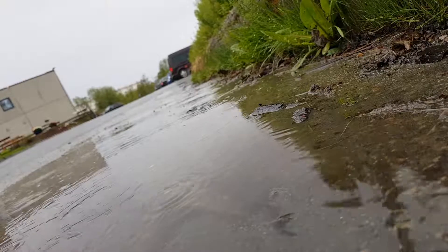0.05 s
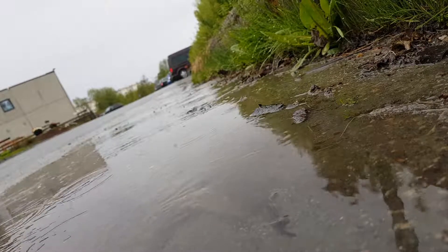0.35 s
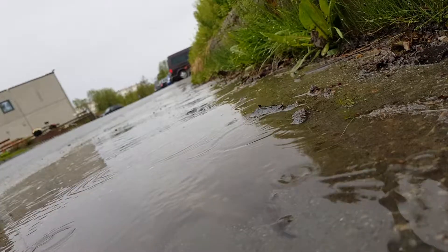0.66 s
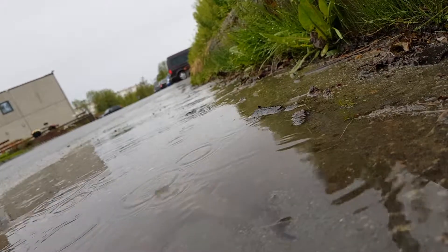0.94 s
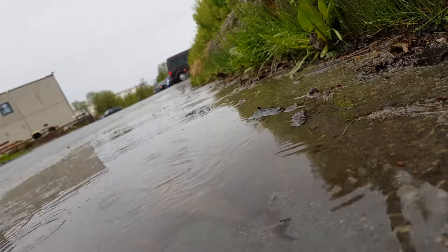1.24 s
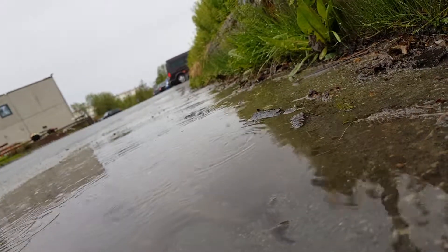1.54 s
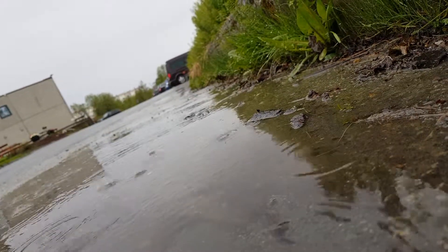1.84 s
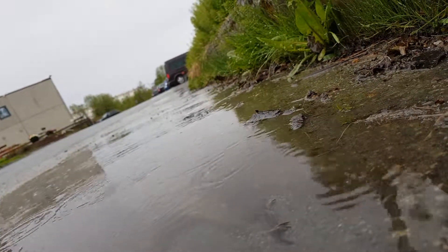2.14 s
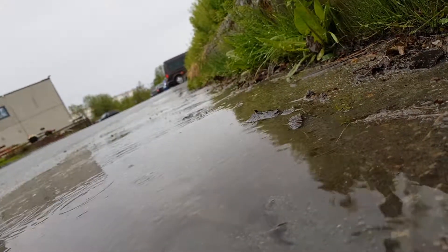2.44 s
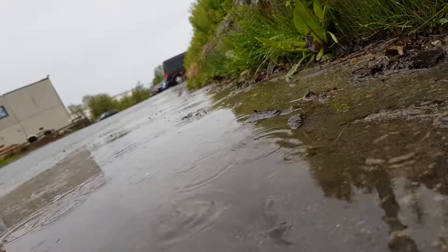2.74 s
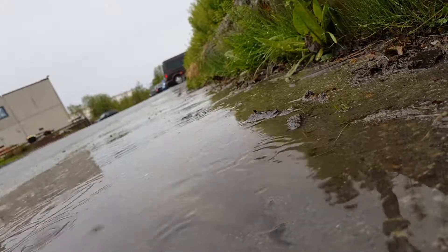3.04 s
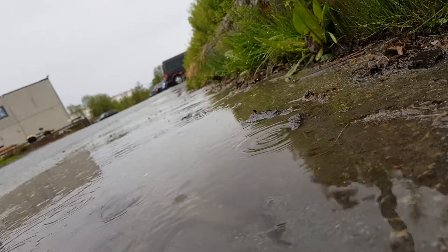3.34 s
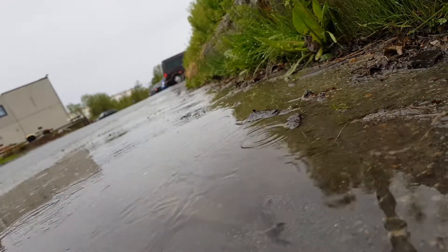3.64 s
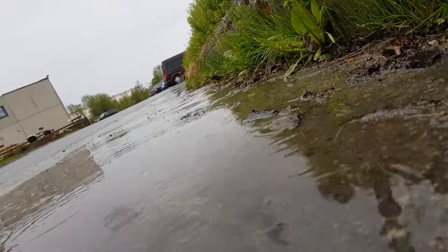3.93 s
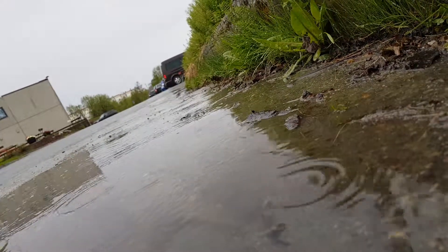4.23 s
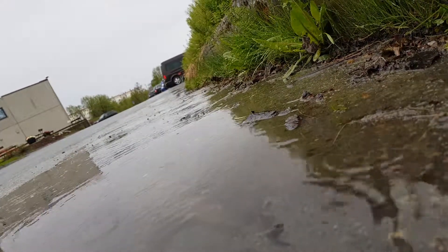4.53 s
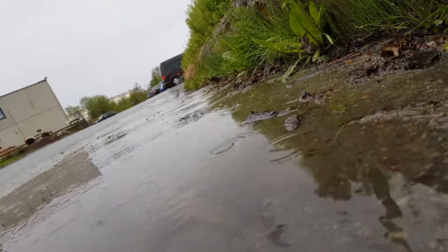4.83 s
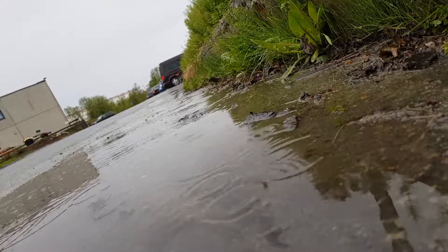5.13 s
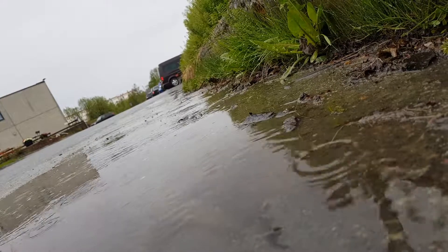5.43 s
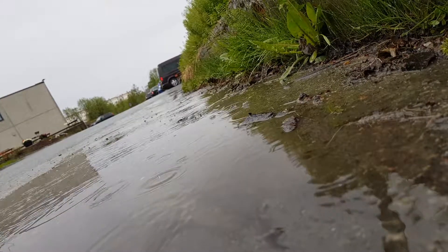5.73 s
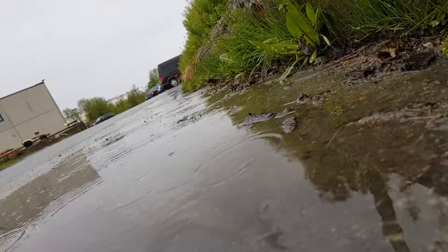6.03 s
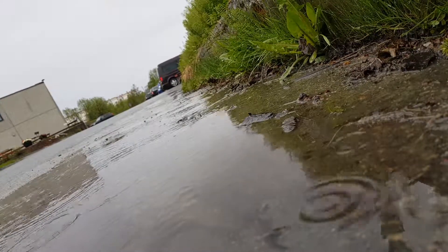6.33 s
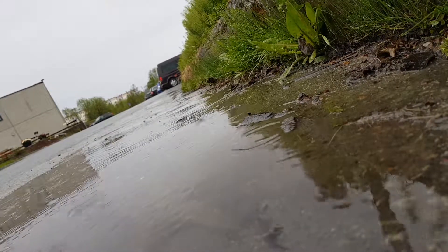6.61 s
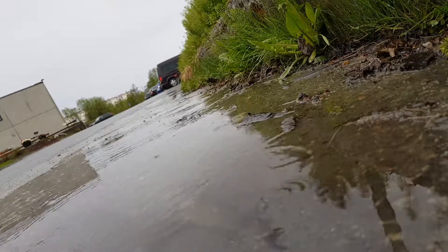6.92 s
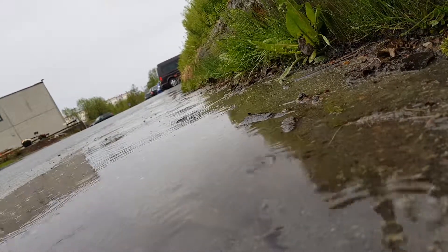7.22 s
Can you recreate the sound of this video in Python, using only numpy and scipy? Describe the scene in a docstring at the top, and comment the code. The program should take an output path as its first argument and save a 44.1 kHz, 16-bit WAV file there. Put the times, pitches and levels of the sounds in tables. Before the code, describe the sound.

Light rain falls by a roadside puddle, heard from just above the ground and mostly on the right. Small drops tap sharply on the wet ground and plink faintly in the water over a fine patter and hiss. Distant traffic rumbles throughout, with a steady electrical hum and a faint fan tone. Near the end a far vehicle passes with a brief low boom, then a distant bird chirps very faintly.

```python
"""Light rain by a roadside puddle

The microphone sits just above the ground, its right port open, its left one muffled. Close by, drops
tap on the wet ground or ring a tiny bubble in the puddle; farther out they merge into hiss. Distant
traffic rumbles and one vehicle booms briefly, over mains hum and a fan. A far bird chirps at the end."""
import sys
import numpy as np
from scipy import signal
from scipy.fft import rfft, irfft, next_fast_len
from scipy.io import wavfile
from scipy.ndimage import uniform_filter1d, map_coordinates

SR = 44100
rng = np.random.default_rng(int(sys.argv[2]) if len(sys.argv) > 2 else 0)


def wav_record(signal):
    """Record a signal, one row per channel, as 16-bit PCM in the file named by sys.argv[1]."""
    frames = np.transpose(np.atleast_2d(signal))
    bounded = np.clip(frames, -1, 1)
    # unit amplitude maps onto the largest positive 16-bit level
    quanta = np.round(bounded * 32767).astype(np.int16)
    wavfile.write(sys.argv[1], SR, quanta)


N = 325017


# Tone of close drops through the microphone, which has a notch near 8 kHz.
# Each row: frequency in Hz, gain in dB.
CLOSE_MIC_TONE = [(400, -20), (1300, 15), (2400, 2.5), (4500, 0), (6500, 0.5), (7400, -3), (8300, -15),
                  (10000, -9.5), (12300, -4.5), (15800, -6)]
# Drops on the wet ground nearest the microphone.
# Each row: start in seconds, peak at the right port in dB, centre in Hz, width in octaves.
GROUND_TAPS = [(0.1154, -30.5, 4100, 0.42), (.211, -28.5, 4700, 0.27), (.231, -38, 4800, 1.2),
               (.3734, -19, 4700, 0.85), (.5254, -37.5, 5400, .6), (1.1142, -29.5, 5000, 0.75),
               (1.1245, -33, 2800, 0.9), (1.1473, -29, 3100, 0.84), (1.814, -27, 3800, .33),
               (1.8594, -37, 4400, 0.66), (2.489, -38, 6500, .5), (3.0658, -39, 8500, .7),
               (3.2465, -37, 3600, .4), (3.495, -41, 8500, .6), (3.5994, -38, 5700, .35),
               (4.522, -36.5, 6400, .3), (4.658, -40, 6000, .4), (4.7896, -39, 5300, .4),
               (4.8492, -38, 4200, .8), (5.0366, -32, 5200, .8), (5.5324, -31.5, 4500, 1),
               (5.7843, -31, 3500, 0.42), (5.984, -40, 7000, .4), (6.1073, -30.5, 4700, 0.27),
               (6.1287, -37, 3500, .5), (6.453, -33, 2400, 0.53), (6.8336, -35, 4000, .8),
               (6.8458, -36, 5900, 0.3), (6.9292, -35, 6500, 1.2), (7.0702, -29, 6100, .42),
               (7.0887, -35, 5500, .8), (7.1174, -29, 4200, .9), (7.1375, -31, 4400, 1.1)]

def taps(splash_t60):
    """A near drop hits the ground with one sharp pulse, then a few milliseconds of splash."""
    out = np.zeros((2, N))
    t = np.arange(1024) / SR
    hz = np.fft.rfftfreq(len(t), 1 / SR)
    for start, db, centre_hz, width_octaves in [*GROUND_TAPS, *faint_drops()]:
        # smaller drops sound higher; a narrow band rings like a plip
        size_colour = 0.04 + 1 / (1 + (np.log2((hz + 1) / centre_hz) / width_octaves) ** 2)
        pulse = causal(amp(along(CLOSE_MIC_TONE, hz)[0]) * size_colour)
        # the flatter a drop lands, the wider its band and the more it splashes
        splash_db = -21 + 3.5 * width_octaves
        splash = amp(splash_db - 60 * t / splash_t60) * rng.standard_normal((2, len(t)))
        tap = signal.fftconvolve((t == 0) + splash, pulse[None], axes=1)
        add(out, start, amp(db) * tap / abs(tap[1]).max())
    return out


def faint_drops(per_second=2.5, peak_db=-41, centre_hz=4200, width_octaves=0.55):
    """Random drops land a little farther off, given as rows like those of GROUND_TAPS."""
    when, size, pitch = rng.random((int(per_second * N / SR), 3)).T
    db = peak_db + 5 * (size - .5)
    hz = centre_hz * 2 ** (pitch - .5)
    return np.column_stack([when * N / SR, db, hz, np.full(len(when), width_octaves)])


# Drops in the puddle beside the microphone.
# Each row: start in seconds, peak at the right port in dB, pitch in Hz, seconds to fade by 60 dB.
PUDDLE_BUBBLES = [(0.2261, -34, 12500, .0017), (0.3993, -42, 14000, .001), (0.504, -45, 14000, .0015),
                  (0.8007, -48, 11500, .0012), (1.9099, -36, 12300, 0.002), (2.535, -33, 13400, .003),
                  (2.7525, -45, 12000, .001), (3.432, -46, 11500, .0016), (5.5584, -45, 13000, .001),
                  (6.9197, -39, 11300, .0012), (7.0973, -30, 12400, 0.0016)]

def bubbles(attack_share):
    """A drop traps a tiny bubble, whose ring swells and dies within a few dozen cycles."""
    out = np.zeros((2, N))
    t = np.arange(SR // 100) / SR
    for start, db, hz, t60 in PUDDLE_BUBBLES:
        attack = (1 - np.exp(-t / (attack_share * t60))) ** 2
        ring = np.sin(2 * np.pi * hz * t) * amp(-60 * t / t60) * attack
        add(out, start, amp(db) * np.array([ring, ring]) / abs(ring).max())
    return out


# Close drops that shatter softly, heard only as spray.
# Each row: start in seconds, relative droplet level in dB.
SOFT_DROPS = [(.49, -40), (.8, -43), (1.39, -41), (1.83, -43), (2.75, -37), (3.06, -43), (4.47, -40),
              (4.55, -41), (5.54, -38.5), (6.76, -42)]

def sprays(droplets, longest_flight_s=0.068, faint_per_second=1.5):
    """A shattered drop scatters tiny droplets that land soon after, ever fewer and fainter."""
    tapped = [(start, -47 + 3.5 * width_octaves) for start, _, _, width_octaves in GROUND_TAPS]
    faint = [(start, -44.5) for start in rng.random(int(faint_per_second * N / SR)) * N / SR]
    start, db = np.transpose(tapped + SOFT_DROPS + faint)[:, :, None]
    flight = rng.random((len(start), droplets)) ** 1.3
    droplet_db = db - 5 * flight + 4.4 * rng.standard_normal(flight.shape)
    landings = start + longest_flight_s * flight
    return ticks(landings.ravel(), droplet_db.ravel(), centre_hz=12500, spread_octaves=0.33, cycles=1.0)


def patter(per_second, base_db, centre_hz, ticks_per_drop):
    """Drops land a few steps away, many faint and few stronger, each trailed by weaker droplets."""
    when, size = rng.random((2, int(per_second * N / SR), 1))
    flight = rng.random((len(when), ticks_per_drop)) * (np.arange(ticks_per_drop) > 0)
    db = base_db + 3.5 * np.minimum(-np.log(size), 3.5) - 14 * np.sqrt(flight)
    landings = when * N / SR + .014 * flight
    return ticks(landings.ravel(), db.ravel(), centre_hz, spread_octaves=0.446, cycles=1.95)


def ticks(times, db, centre_hz, spread_octaves, cycles):
    """Each droplet lands with one damped tick of random pitch, heard through the microphone."""
    t = np.arange(128) / SR
    octaves = spread_octaves * rng.standard_normal((len(times), 1))
    hz = np.clip(centre_hz * 2 ** octaves, 1500, 15500)
    waves = amp(db)[:, None] * np.sin(2 * np.pi * hz * t) * np.exp(-hz * t / cycles)
    places = np.maximum(times * SR, 0).astype(int)[:, None] + np.arange(len(t))
    track = np.bincount(places.ravel(), waves.ravel(), N)[:N]
    return filtered(track, lambda f: amp(along(CLOSE_MIC_TONE, f)[0]))


def near_rain():
    """Near drops reach the open right port directly and the left one faint and dull."""
    left, right = (taps(splash_t60=0.013)
                   + bubbles(attack_share=0.088)
                   + patter(per_second=120, base_db=-54.5, centre_hz=4400, ticks_per_drop=4)
                   + patter(per_second=58, base_db=-49.0, centre_hz=12000, ticks_per_drop=5)
                   + sprays(droplets=16))
    muffled = amp(-22) * filtered(left, lambda hz: below(hz, 4000, order=4))
    return np.array([muffled, right])


# Hiss of far rain; in the left treble, only the microphone's faint noise floor.
# Each row: frequency in Hz, left and right gain in dB.
HISS_COLOUR = [(2200, -92.5, -89), (2490, -94.5, -86.5), (2790, -102.5, -88), (3030, -103.5, -91.5),
               (4600, -108.8, -93), (5700, -118.4, -94.5), (6700, -119.4, -96), (7420, -119.6, -101.4),
               (8200, -119.9, -118.7), (9670, -117.5, -111.1), (11950, -113.3, -104.2),
               (14400, -113.6, -108.1), (15700, -113.7, -107.8)]
# Its slow rise and fall. Each row: time in seconds, gain in dB.
HISS_LEVEL = [(0, 0), (1.2, 0.4), (2.6, 0.6), (3.3, -0.5), (4.5, 0), (5.3, -0.2), (6.3, -0.4), (7.37, 0)]
# A fine sizzle over the rain. Each row: frequency in Hz, gain in dB.
SIZZLE_COLOUR = [(1500, -30), (3000, -1), (4700, 11), (7000, -8), (8600, -1.5), (9600, -17), (12000, 1),
                 (13800, 3), (15800, -10)]
# Its spells. Each row: start in seconds, length in seconds, level at the right port in dB.
SIZZLE_SPELLS = [(0, .55, -65.5), (1.8, 0.34, -65.5), (2.26, 0.48, -61.5)]

def far_rain(flutter_db=0.36):
    """Countless far drops merge into hiss over the noise floor; a finer sizzle comes and goes."""
    hiss = filtered(patchy(patchy_db=1.25),
                    lambda hz: amp(along(HISS_COLOUR, hz)) * above(hz, 2295, order=12))
    # the highest hiss comes from few close drops, so it flutters most
    treble = filtered(hiss[1], lambda hz: above(hz, 7100, order=6))
    treble_db = -1.66 + wobble(15) + 0.62 * wobble(7)
    hiss[1] = amp(-1) * (hiss[1] - treble) + amp(treble_db) * treble
    sizzle = unit(filtered(rng.standard_normal((2, N)), lambda hz: amp(along(SIZZLE_COLOUR, hz))))
    spells = sum(amp(db) * swell(start, length, attack_s=.06, release_s=0.2)
                 for start, length, db in SIZZLE_SPELLS)
    hiss_db = curve(HISS_LEVEL) + flutter_db * wobble(8)
    return amp(hiss_db) * hiss + spells * sizzle * amp([[-18], [0]])


# Distant traffic from ground level. Each row: frequency in Hz, left and right gain in dB.
TRAFFIC_COLOUR = [(25, -85, -84), (68, -70.5, -70), (127.6, -68, -66.5), (167.3, -59.7, -59.5),
                  (202, -66.5, -64), (218, -70.5, -64.5), (251, -65.7, -61.8), (295, -64, -61.5),
                  (331, -73.5, -64.5), (396, -73.5, -69), (524, -69.5, -76.5), (748, -73, -74.5),
                  (885, -79.5, -72.5), (1030, -77, -74.5), (1147, -73.5, -72), (1235, -77, -74),
                  (1340, -82, -82), (1500, -81, -80.5), (1590, -83.5, -82.5), (1730, -84.5, -79),
                  (1985, -89, -82), (2260, -97, -85.5)]
# How alike it is at the two ports. Each row: frequency in Hz, coherence 0-1, left lead in radians.
PORT_LIKENESS = [(25, .9, 0.5), (65, .98, -0.05), (197, 0.97, -0.04), (285, 0.91, 0.26), (390, .1, 2),
                 (465, 0.16, 1), (600, 0.61, -0.43), (788, 0.72, -0.3), (884, 0.2, -1.5), (937, 0.52, -3.5),
                 (1000, .64, -3.5), (1160, 0.92, -4.1), (1240, 0.7, -4.4), (1306, 0.32, -4.3),
                 (1483, 0.78, -3.5), (1666, 0.54, -4.5), (1730, 0.3, -5.2), (1870, .22, -5.5),
                 (2050, 0, -10.5), (2230, 0.7, -10.5)]
# The deep engine drone. Each row: time in seconds, gain in dB.
DRONE_LEVEL = [(0, 0), (1.05, -1), (1.7, 0.5), (2.25, -2.5), (3.2, 3), (4.5, -1.5), (4.9, 1), (5.7, -0.5),
               (7.37, 0.5)]
# The road roar above it. Each row: time in seconds, gain in dB.
ROAR_LEVEL = [(0, -0.9), (1.05, .5), (1.7, -0.1), (2.8, 0.1), (4.3, -0.8), (5.4, -0.4), (6.2, 0.14),
              (7.37, 0.1)]

def traffic():
    """Far engines rumble; their deep drone wanders and the road roar swells as vehicles come and go."""
    right, unrelated = patchy(patchy_db=.5)
    coherence = lambda hz: np.clip(along(PORT_LIKENESS, hz)[0], 0, 1)
    left = filtered(right, lambda hz: coherence(hz) * np.exp(1j * along(PORT_LIKENESS, hz)[1]))
    left += filtered(unrelated, lambda hz: np.sqrt(1 - coherence(hz) ** 2))
    band = lambda hz: below(hz, 2210, order=12) * above(hz, 15, order=2)
    road = filtered(np.array([left, right]), lambda hz: amp(along(TRAFFIC_COLOUR, hz)) * band(hz))
    drone = filtered(road, lambda hz: below(hz, 89, order=5))
    bass = filtered(road, lambda hz: below(hz, 170, order=5))
    rumble, roar = bass - drone, road - bass
    return amp(curve(DRONE_LEVEL)) * drone + rumble + amp(curve(ROAR_LEVEL)) * roar


def far_engine(note_hz=166.1, drift_hz=8, jitter_hz=4, level_db=-53):
    """One far engine stands out, its note drifting with its load and its level wavering."""
    hz = note_hz + drift_hz * wobble(2.5) + jitter_hz * wobble(25)
    return amp(level_db) * unit(amp(3 * wobble(6)) * sine(hz))


# Road noise of a single far vehicle. Each row: frequency in Hz, gain in dB.
WHOOSH_COLOUR = [(120, -30), (260, -4), (340, 2.5), (480, 2), (620, -2), (900, -13), (2000, -36),
                 (4000, -80)]
# Vehicles passing far from the microphone.
# Each row: nearest moment in seconds, seconds to fade by 3 dB, level when nearest in dB.
VEHICLE_PASSES = [(2.98, 0.13, -49.5), (6.62, 0.12, -43.5)]

def passing_whoosh():
    """The dull road noise of each passing vehicle rises and falls with its distance."""
    noise = filtered(rng.standard_normal((2, N)), lambda hz: amp(along(WHOOSH_COLOUR, hz)))
    t = np.arange(N) / SR
    power = sum(amp(db) ** 2 / (1 + ((t - nearest) / fade_s) ** 2)
                for nearest, fade_s, db in VEHICLE_PASSES)
    return np.sqrt(power) * unit(noise + 0.48 * noise[::-1])  # the ports share part of the noise


# The last vehicle's exhaust as it draws near. Each row: crest time in seconds, typical level in dB.
EXHAUST_SURGES = [(6.02, -51), (6.42, -42)]

def exhaust_boom(nearest_hz=68.6, sag_hz_per_s=11, surge_width_s=0.11):
    """One low exhaust order of the passing vehicle surges while its pitch sinks."""
    t = np.arange(N) / SR
    nearest_s = VEHICLE_PASSES[-1][0]
    hz = nearest_hz - sag_hz_per_s * (t - nearest_s)
    surges = sum(amp(db) * np.exp(-((t - crest) / surge_width_s) ** 2) for crest, db in EXHAUST_SURGES)
    return surges * amp(0.7 * wobble(20)) * np.sqrt(2) * sine(hz)


# Mains hum under the traffic. Each row: harmonic number, level in dB, right minus left in dB.
HUM_HARMONICS = [(1, -51.5, -1), (2, -41.4, 1.7), (4, -65, -1)]

def mains_hum(hum_hz=100.06):
    """Steady mains harmonics waver a little in the open air."""
    phase = 2 * np.pi * hum_hz * np.arange(N) / SR
    out = np.zeros((2, N))
    for harmonic, db, tilt_db in HUM_HARMONICS:
        offset = rng.uniform(0, 2 * np.pi)
        tone = np.sqrt(2) * np.sin(harmonic * (phase + offset) + 0.26 * wobble(9))
        balance = amp([[-tilt_db / 2], [tilt_db / 2]])
        out += amp(db + 0.6 * wobble(7)) * balance * tone
    return out


def fan(tone_hz=293, half_width_hz=2.3):
    """A fan's fuzzy tone is a very narrow band of noise, a little stronger on the right."""
    tone = filtered(rng.standard_normal(N), lambda hz: below(hz - tone_hz, half_width_hz, order=2))
    return amp(-53.0) * unit(tone) * amp([[-1.5], [1.5]])


# A bird far from the microphone. Each row: start in seconds, length in seconds,
# first and last pitch in Hz, direct level at the right port in dB.
BIRD_CHIRPS = [(7.12, 0.03, 4400, 4400, -70), (7.274, 0.088, 3600, 4400, -69.5)]

def bird(scatter_t60=.25, scatter_db=2):
    """Thin whistles, held or gliding up to a level pitch, are scattered by trees and walls."""
    direct = np.zeros((2, N))
    for start, length, first_hz, last_hz, db in BIRD_CHIRPS:
        progress = np.linspace(0, 1, int(length * SR))
        hz = last_hz + (first_hz - last_hz) * (1 - progress) ** 2
        whistle = np.sqrt(2 * abs(np.sin(np.pi * progress))) * sine(hz)
        add(direct, start, amp(db) * amp([[-6], [0]]) * whistle)
    t = np.arange(SR // 2) / SR
    tail = rng.standard_normal((2, len(t))) * amp(-60 * t / scatter_t60)
    scattered = signal.fftconvolve(direct, tail / np.linalg.norm(tail[1]), axes=1)[:, :N]
    return direct + amp(scatter_db) * scattered


def amp(db):
    """Decibels as a gain."""
    return 10 ** (np.asarray(db) / 20)


def unit(x):
    """x scaled to an RMS of 1."""
    return x / np.sqrt(np.mean(x ** 2) + 1e-20)


def sine(hz):
    """A sine that follows one frequency per sample."""
    return np.sin(2 * np.pi * np.cumsum(hz) / SR)


def along(points, hz):
    """Each column of a table of frequencies, read on a log axis."""
    knots_hz, *columns = np.transpose(points)
    return np.array([np.interp(np.log(hz + 1), np.log(knots_hz + 1), column) for column in columns])


def curve(rows):
    """One value per sample from rows of time and value."""
    return np.interp(np.arange(N) / SR, *np.transpose(rows))


def swell(start_s, length_s, attack_s, release_s):
    """An envelope that rises to 1, holds and dies away."""
    t = np.arange(N) / SR - start_s
    return np.exp(np.minimum(t, 0) / attack_s - np.maximum(t - length_s, 0) / release_s)


def wobble(rate):
    """A smooth random curve, rate knots a second."""
    return map_coordinates(rng.standard_normal(int(N * rate / SR) + 4), [np.arange(N) * rate / SR])


def filtered(x, response):
    """x through a complex frequency response."""
    size = next_fast_len(N + SR // 2)
    return irfft(rfft(x, size) * response(np.fft.rfftfreq(size, 1 / SR)), size)[..., :N]


def below(hz, edge_hz, order):
    """Gain of a low-pass."""
    return 1 / np.sqrt(1 + (hz / edge_hz) ** (2 * order))


def above(hz, edge_hz, order):
    """Gain of the matching high-pass."""
    return np.sqrt(1 - below(hz, edge_hz, order) ** 2)


def causal(gain):
    """The sharpest impulse response that has this gain."""
    cepstrum = irfft(np.log(np.maximum(gain, 1e-6)))
    half = len(cepstrum) // 2
    fold = np.r_[1, np.full(half - 1, 2), 1, np.zeros(half - 1)]
    return irfft(np.exp(rfft(cepstrum * fold)))


def patchy(patchy_db):
    """Two unrelated noises of 0 dB per Hz, with patches of random gain in time and frequency."""
    spectra = signal.stft(rng.standard_normal((2, N)), nperseg=512)[2]
    patches = uniform_filter1d(rng.standard_normal(spectra.shape[1:]), size=5, axis=0)
    patches = uniform_filter1d(patches, size=18, axis=1)
    noise = signal.istft(spectra * amp(patchy_db * unit(patches)), nperseg=512)[1][:, :N]
    return unit(noise) * np.sqrt(SR / 2)


def add(track, start_s, sound):
    """Mix a stereo sound into the track."""
    part = track[:, max(round(start_s * SR), 0):][:, :sound.shape[1]]
    part += sound[:, :part.shape[1]]


def scene():
    """Road, hum, fan, rain and bird meet at the edge of the puddle."""
    road = traffic() + far_engine() + exhaust_boom() + passing_whoosh()
    return road + mains_hum() + fan() + far_rain() + near_rain() + bird()


def record(dry):
    """The camera behind the microphone keeps nothing above its band limit."""
    limit_hz = 15850
    return filtered(dry, lambda hz: hz < limit_hz)


dry = scene()
out = record(dry)
wav_record(out)
```